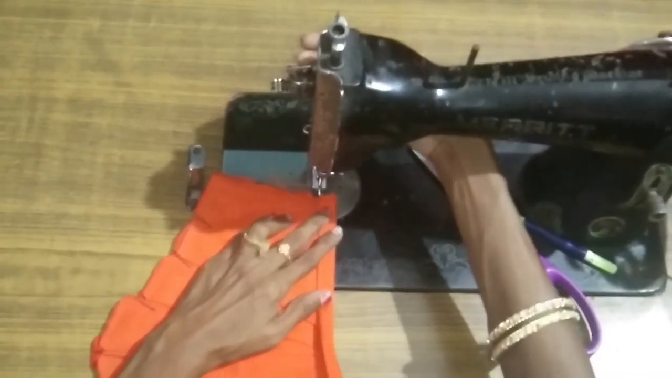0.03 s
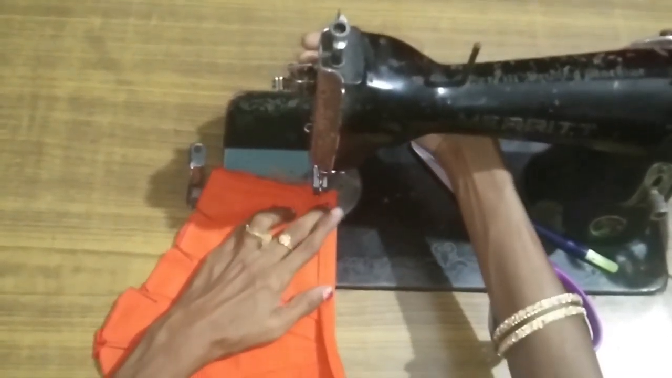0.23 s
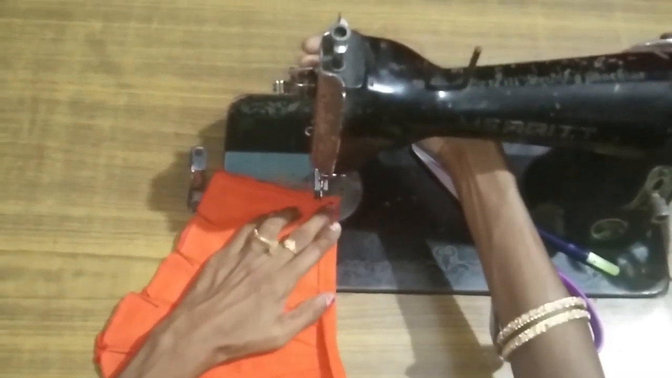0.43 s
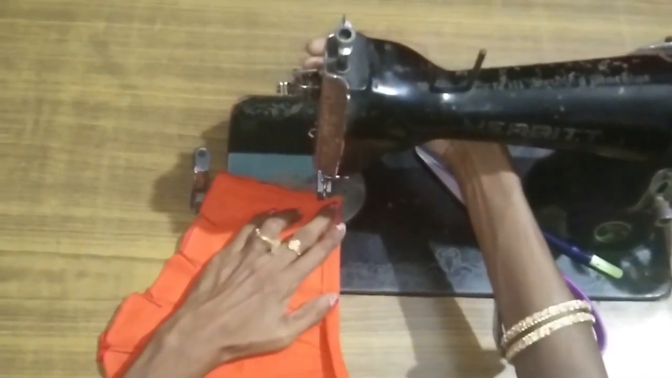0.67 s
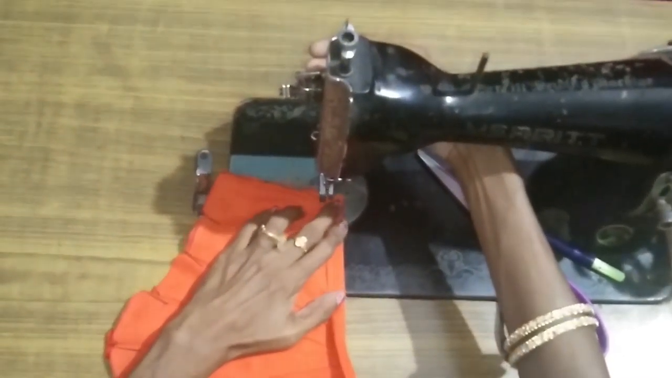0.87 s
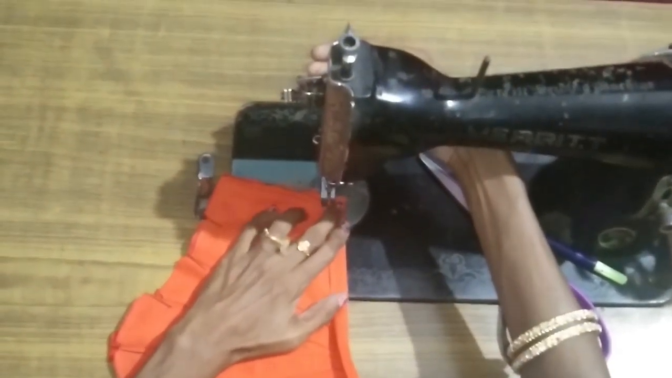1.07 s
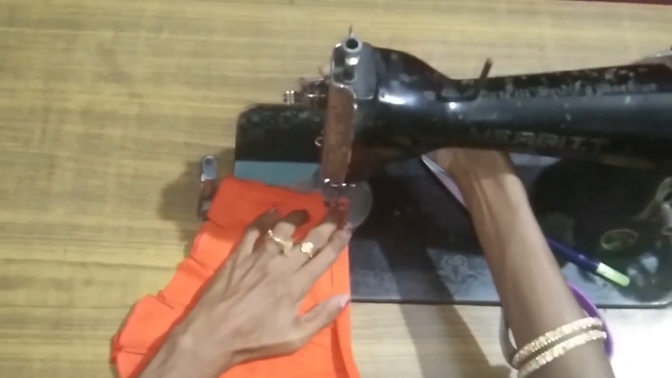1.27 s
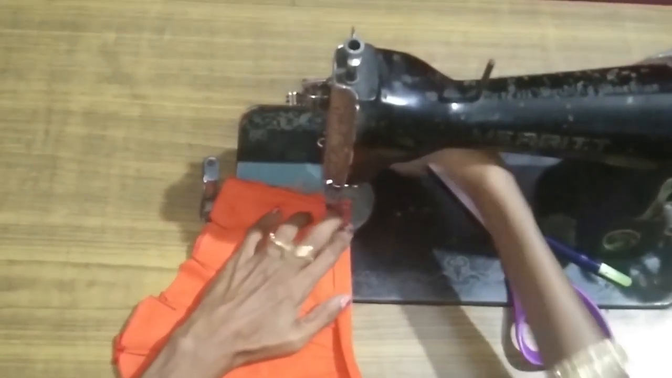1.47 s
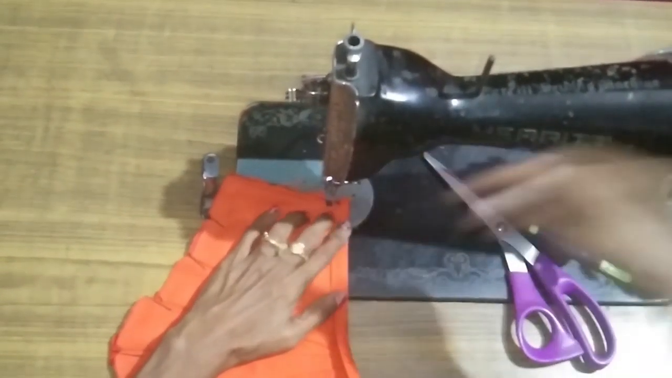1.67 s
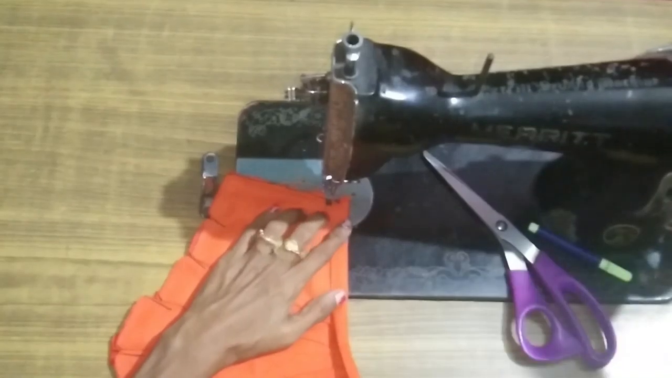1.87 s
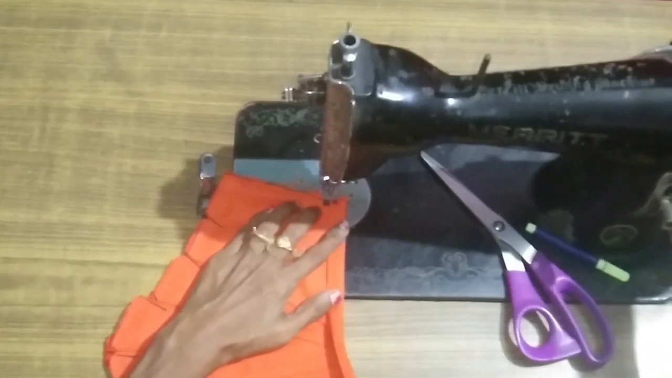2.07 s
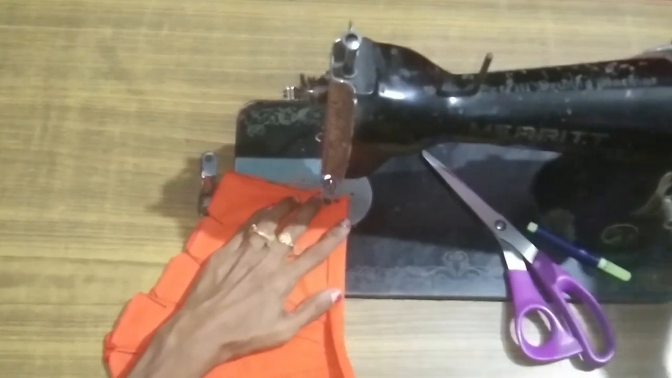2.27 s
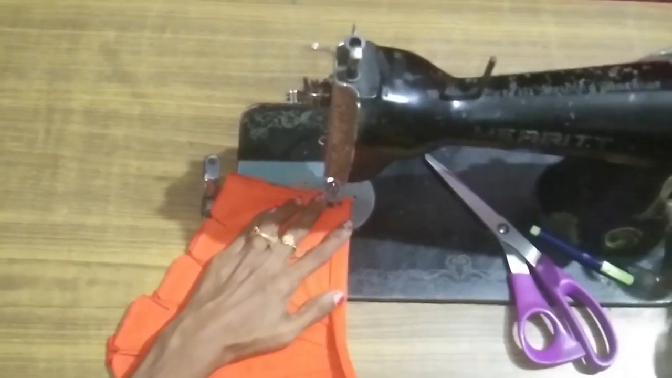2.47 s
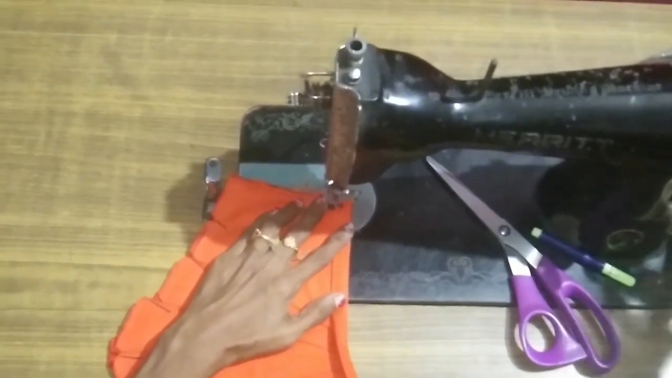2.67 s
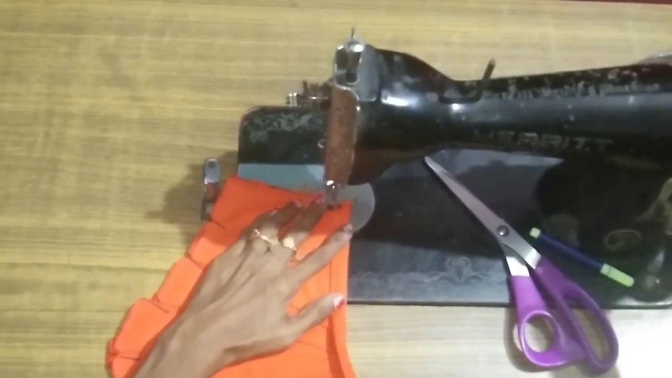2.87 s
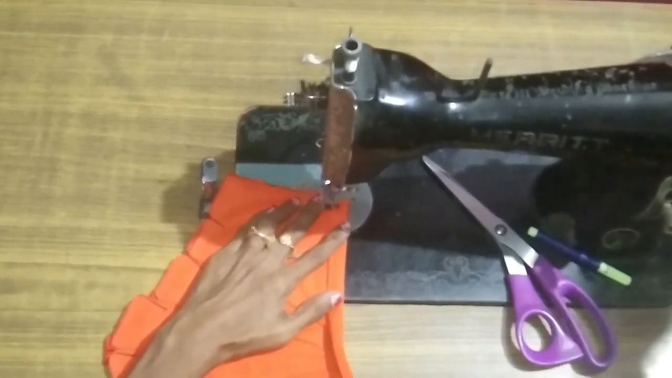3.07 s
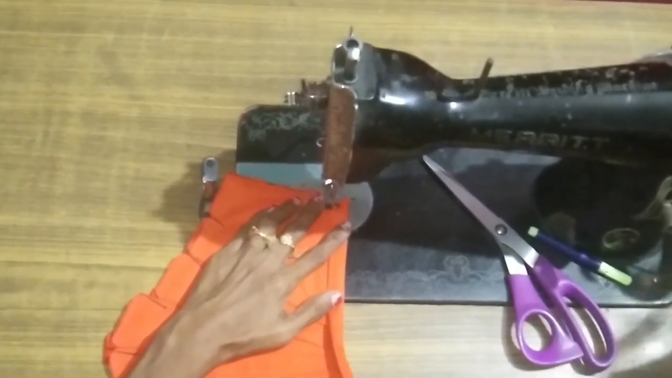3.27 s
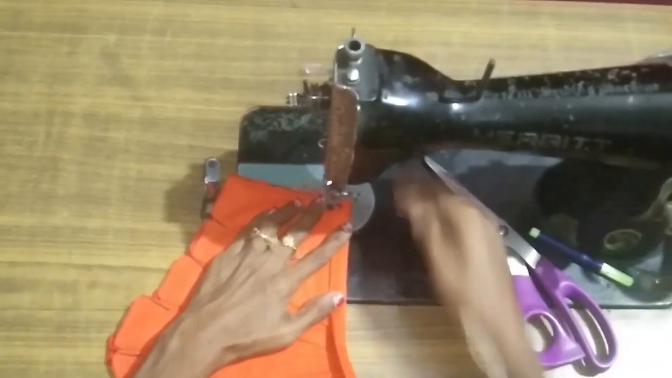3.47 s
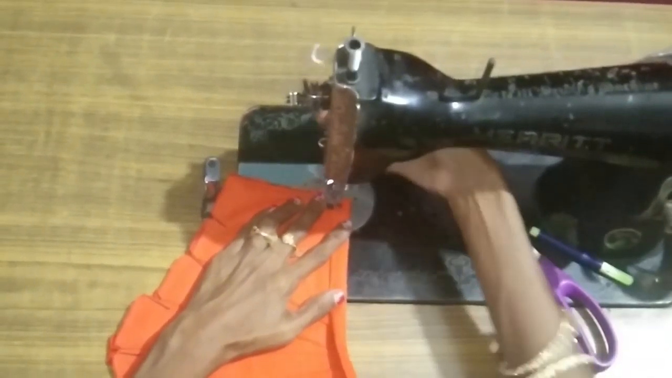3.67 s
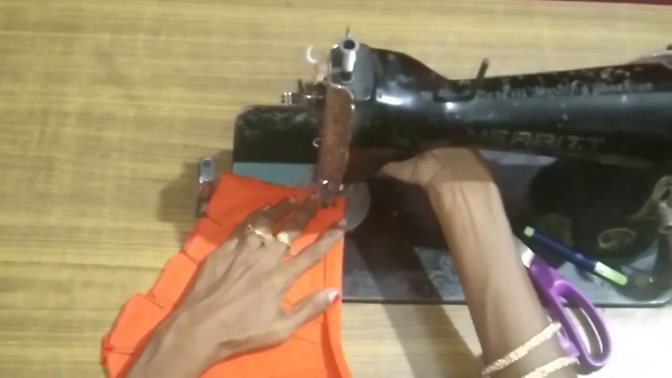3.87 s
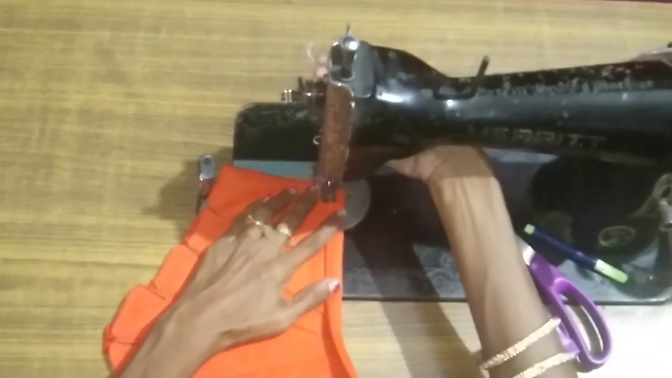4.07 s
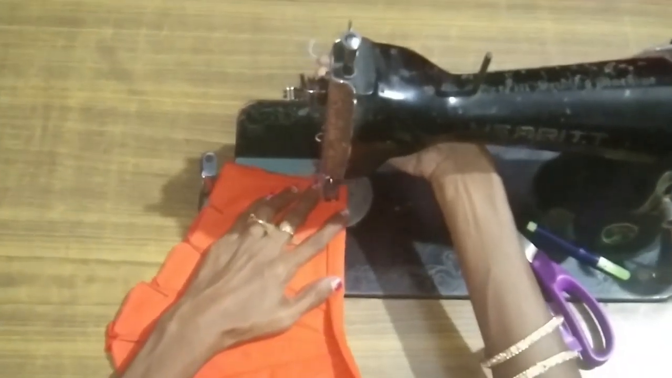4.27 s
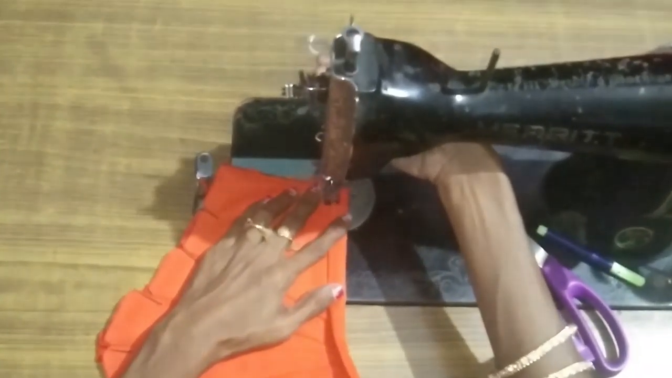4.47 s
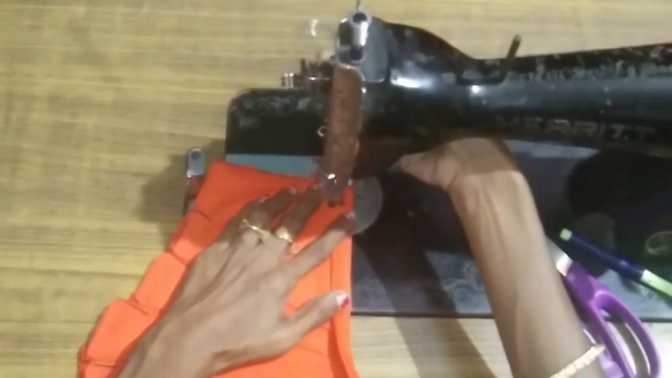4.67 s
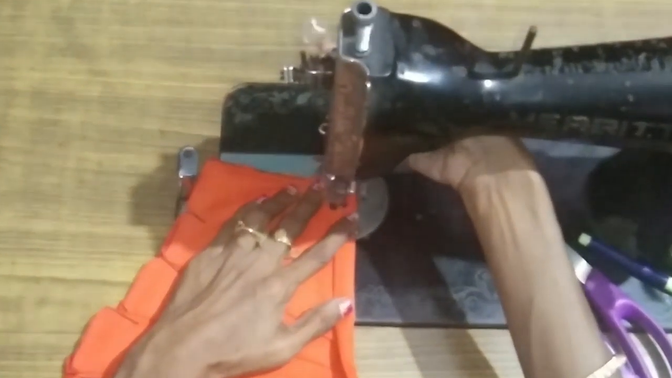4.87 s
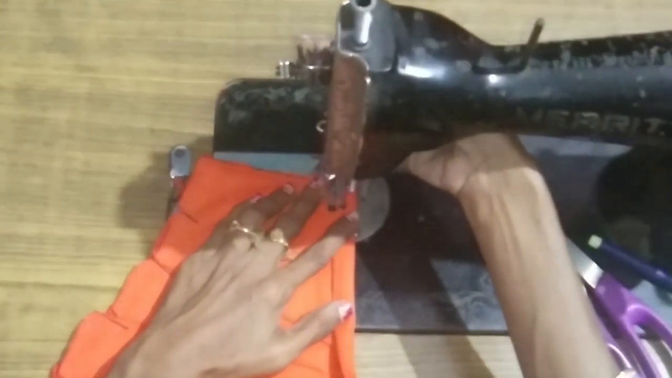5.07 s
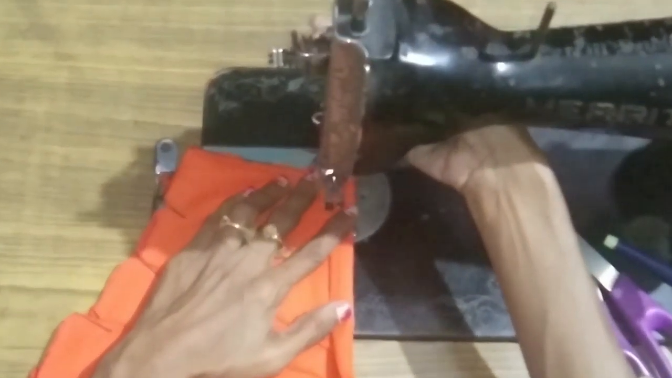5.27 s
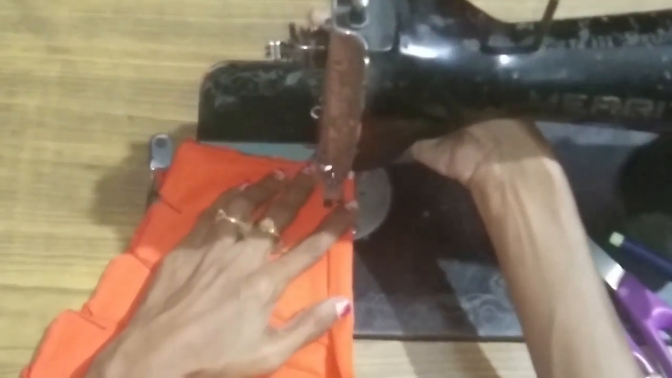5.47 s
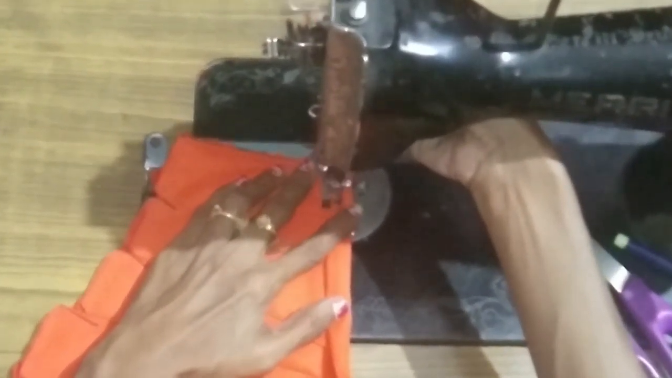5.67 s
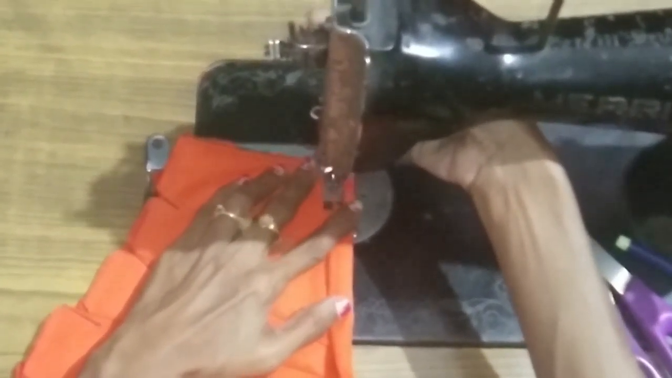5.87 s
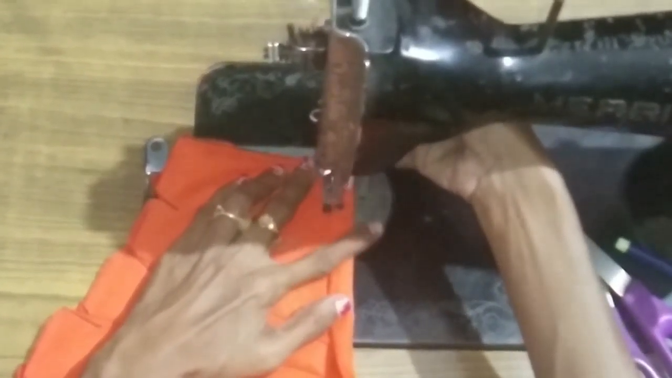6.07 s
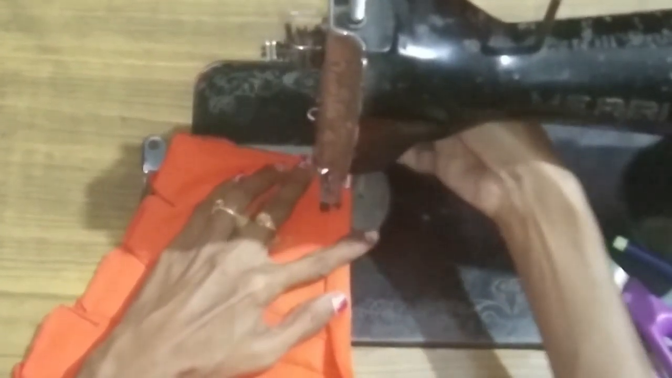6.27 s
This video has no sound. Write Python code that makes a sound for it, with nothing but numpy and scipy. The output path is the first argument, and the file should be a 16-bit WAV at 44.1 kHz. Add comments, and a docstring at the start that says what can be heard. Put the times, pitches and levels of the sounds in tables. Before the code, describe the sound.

After faint cloth rustle and jingling bangles, a sewing machine gives some metal clacks and starts stitching fast with dull thumps.

```python
"""An old cast-iron sewing machine on a wooden table in a small hard room.
After a brief low hum, cloth rustles, the presser foot drops at 1.57 s and bangles jingle.
The handwheel is nudged round with a few clacks; from 3.6 s the machine runs up to seven stitches
a second. Each stitch is a dull thump of the feed, a sharp clack of the needle bar and a softer
rattling return of the shuttle. The blows ring the metalwork and shove the table top."""
import sys
import numpy as np
from scipy import signal
from scipy.fft import rfft, irfft, next_fast_len
from scipy.io import wavfile
from scipy.ndimage import uniform_filter1d

SR = 44100
rng = np.random.default_rng(int(sys.argv[2]) if len(sys.argv) > 2 else 0)


def wav_out(sig):
    """Save sig, one row per channel (or a flat mono array), as 16-bit PCM at SR to the path in sys.argv[1]."""
    wavfile.write(sys.argv[1], SR, np.round(np.clip(np.atleast_2d(sig).T, -1, 1) * 32767).astype(np.int16))


N = 279594
TIME = np.arange(N) / SR

# One shaft turn per stitch. Each row: needle-bar clack in seconds, steel accent in dB,
# thump accent in dB.
STITCHES = [(3.616, -6, -3), (3.84, -.5, 0), (4.036, 0, 1), (4.2397, -.5, -2), (4.4331, 0, 0.5),
            (4.6193, 0, 1), (4.8048, -0.5, 0.5), (4.97, 0.5, 0), (5.1264, -0.5, 2), (5.2886, -1, 1),
            (5.447, 0, -1), (5.603, -0.5, 2.5), (5.76, 0.5, 0), (5.904, -0.5, 0.5), (6.0456, 0, 0.5),
            (6.1886, -.5, 0.5), (6.3334, -0.5, -2.5)]
STITCH_S, STEEL_ACCENT_DB, THUMP_ACCENT_DB = np.transpose(STITCHES)
USUAL_STITCHES_PER_S = 6


def each_stitch(turn, accent_db):
    """The shaft repeats one turn's blows at speed-dependent levels: rows of (s, dB, other columns)."""
    number = np.arange(len(STITCH_S))
    clock_s = np.r_[2 * STITCH_S[0] - STITCH_S[1], STITCH_S, 2 * STITCH_S[-1] - STITCH_S[-2]]
    rows = []
    for turns, level_db, db_per_doubling, *tone in turn:
        start_s = np.interp(number + turns, np.arange(-1, len(STITCH_S) + 1), clock_s)
        levels_db = level_db + accent_db + db_per_doubling * speed_doublings(start_s)
        rows += [(s, db, *tone) for s, db in zip(start_s, levels_db) if s < TIME[-1]]
    return rows


def speed_doublings(times_s):
    """Shaft speed from the stitch spacing, in doublings above the usual speed."""
    stitches_per_s = np.interp(times_s, STITCH_S, 1 / np.gradient(STITCH_S))
    return np.log2(stitches_per_s / USUAL_STITCHES_PER_S)


# Each row: offset in turns, level at usual speed in dB, dB per speed doubling, then table thud,
# iron bed, bright steel and chatter in dB re that level.
TURN_CLACKS = [(-.088, -25, -10, -18, -13, -6.5, -6.5), (0, -10.5, 2, -23.5, -25.5, -8.5, -6.5)]
# Each row: start in seconds, level in dB, then iron bed and bright steel in dB re that level.
HAND_CLACKS = [(1.406, -33, -19, -17.5), (1.5699, -31, -5.5, 0), (2.171, -26.5, -13, -13),
               (2.4266, -33.5, -16, -3.5), (2.4735, -26, -17, -6.5), (2.576, -29, -4.5, -2.5),
               (2.6973, -14.5, -14.5, -7), (2.7558, -17, -13, -6.5), (2.7716, -13.5, -18.5, -8.5),
               (2.9474, -22.5, -20.5, -6.5), (3.0018, -19, -16, -8.5), (3.236, -25.5, -24, -11.5),
               (3.29, -21, -18, -9), (3.5804, -21.5, -19, -9)]


def clacks():
    """Hard blows: presser foot and nudged wheel, then a feed tick and the needle bar in every turn."""
    return by_hand(HAND_CLACKS, chatter_db=-6) + each_stitch(TURN_CLACKS, STEEL_ACCENT_DB)


# Columns as in TURN_CLACKS and HAND_CLACKS.
TURN_RETURNS = [(0.424, -16, 1.2, -26, -15.5, -7.5, -5.5), (0.529, -17, 15, -23, -19.5, -14, -6.5)]
HAND_RETURNS = [(2.1856, -38, -2, -26), (2.4853, -22.5, -12, -9), (3.0923, -28.5, -9, -13),
                (3.1268, -33, -12, -6), (3.4251, -33, -16.5, -7.5)]


def shuttle_returns():
    """Soft, rattling blows as the shuttle and take-up lever come back."""
    return by_hand(HAND_RETURNS, chatter_db=-2) + each_stitch(TURN_RETURNS, STEEL_ACCENT_DB)


def by_hand(rows, chatter_db):
    """Hand-driven strokes: rows of start in seconds, then level, thud, bed, steel and chatter in dB."""
    return [(s, db, bed_db - 2.5, bed_db, steel_db, chatter_db) for s, db, bed_db, steel_db in rows]


# Each row: offset in turns, level at usual speed in dB, dB per speed doubling, then deep boom
# and linkage rattle in dB re that level.
TURN_THUMPS = [(-.16, -30, 3, -7.5, 2.5), (-.06, -36.5, 14, -14, -2), (.12, -41, 15, -1, 11.5),
               (.49, -36.5, 4, -8, 4)]
# Each row: start in seconds, level in dB.
HAND_THUMPS = [(2.185, -32.5), (2.683, -26), (3.222, -33.5), (3.568, -36.5)]


def feed_thumps():
    """Dull blows of crank and feed, by hand and then in every turn."""
    boom_db, rattle_db = -20, -4.5
    nudged = [(s, db, boom_db, rattle_db) for s, db in HAND_THUMPS]
    return nudged + each_stitch(TURN_THUMPS, THUMP_ACCENT_DB)


def contacts(start_s, level_db, chatter_db, crack_db, crack_s, chatter_s, swell_s):
    """A first contact builds in about 2 ms; loose parts cross their play, then chatter and settle."""
    crack = decays(start_s, level_db + crack_db, crack_s)
    crack = uniform_filter1d(uniform_filter1d(crack, size=54), size=36)
    chatter_start_s = start_s + 0.0074
    settling = decays(chatter_start_s, level_db + chatter_db, chatter_s)
    swelling = decays(chatter_start_s, level_db + chatter_db, swell_s)
    return grains(np.abs(crack), per_s=SR) + grains(np.abs(settling - swelling), per_s=1600)


def strokes(rows, crack_db, crack_s, chatter_s, swell_s):
    """Shaking of iron bed, arm and small steel parts; the heavier the part, the longer the contact."""
    start_s, level_db, _, bed_db, steel_db, chatter_db = np.transpose(rows)
    arm_crack_db = -3.5  # the heavy arm hardly follows a first contact
    parts = [(bed_db, 1.4, 0), (0, 1.2, arm_crack_db), (steel_db, 1, 0)]
    return np.array([contacts(start_s, level_db + part_db, chatter_db, crack_db + soften_db,
                              crack_s * stretch, chatter_s * stretch, swell_s * stretch)
                     for part_db, stretch, soften_db in parts])


# Each row: frequency in Hz, relative level in dB.
METAL_SPECTRUM = [(350, -25.5), (600, -5), (1000, -7), (1700, -6.5), (2300, -2.5), (3300, -1), (3900, -3.5),
                  (5800, 2.5), (7200, 4), (8300, -8), (10000, -19), (12500, -30.5), (15500, -28.5)]
# Each row: centre in Hz, width in Hz, lift in dB.
METAL_MODES = [(648, 28, 8), (1850, 80, 4), (2000, 70, -5), (2130, 24, 7), (2263, 40, 5.5), (2470, 50, -3),
               (2631, 28, 5), (2773, 25, 5), (3160, 20, 6.5), (3318, 28, 4.5), (3476, 24, 7.5),
               (3523, 22, 3), (3857, 22, 3), (4277, 26, 5), (4480, 100, 3), (6946, 25, 2), (7223, 25, 4),
               (7297, 26, 5)]


def metalwork(clack_rows, return_rows, thump_rows):
    """Clacks, returns, slack linkage and sliding steel ring the body of the machine."""
    hard = strokes(clack_rows, crack_db=1.5, crack_s=0.0034, chatter_s=0.017, swell_s=0.0036)
    soft = strokes(return_rows, crack_db=0, crack_s=0.0066, chatter_s=0.021, swell_s=0.0052)
    bed, arm, steel = hard + soft
    blows = (from_db(15) * cut(bed, 1850, "low", order=3)
             + from_db(1.2) * cut(arm, [1800, 4000], "band")
             + from_db(4) * cut(steel, 3700, "high", order=3))
    # the linkage takes up its slack after each thump
    thump_s, thump_db, _, rattle_db = np.transpose(thump_rows)
    slack = decays(thump_s + 0.0092, thump_db + rattle_db - 3.5, decay_s=0.015)
    hiss = rubbing(hand_db=-55, usual_db=-53, db_per_doubling=10)
    shaking = room(blows + grains(slack + hiss, per_s=1600), wet_db=1.5, build_s=0.002)
    return colour(shaking + tension_spring(shaking), METAL_SPECTRUM, METAL_MODES)


# Each row: centre in Hz, width in Hz, relative level in dB.
SPRING_MODES = [(6500, 160, -1), (6850, 100, 6.5), (7350, 98, -30)]


def tension_spring(shaking):
    """The thread-tension spring pings near 7 kHz when the steel parts shake it."""
    ring = np.zeros(N)
    for hz, width_hz, db in SPRING_MODES:
        band = cut(shaking, [hz - width_hz / 2, hz + width_hz / 2], "band", order=1)
        ring += from_db(db) * np.sqrt(SR / (np.pi * width_hz)) * band
    return from_db(-28) * ring


# Table top and its deep boom. Each row: frequency in Hz, relative level in dB.
WOOD_SPECTRUM = [(120, -31.5), (220, -8), (300, -7), (420, 2.5), (520, -9), (800, -16.5), (1500, -21),
                 (4000, -64)]
BOOM_SPECTRUM = [(30, -39), (60, -14), (80, 2), (105, -7), (150, 11), (200, -5.5), (350, -5.5), (1500, -67)]
# Each row: centre in Hz, width in Hz, lift in dB.
TABLE_MODES = [(84.5, 33, 9), (146.16, 23, -1), (180, 9.9, 4), (217, 34, 5), (354.6, 32, 9), (434, 150, 2),
               (460, 38, 4), (690, 10, -3)]


def table_top(stroke_rows, thump_rows):
    """Every thump and stroke shoves the wooden top; the machine judders on it and the belt rumbles."""
    thump_s, thump_db, boom_db, _ = np.transpose(thump_rows)
    stroke_s, stroke_db, thud_db = np.transpose(stroke_rows)[:3]
    thump_power = decays(thump_s, thump_db - 1.5, decay_s=0.034)
    stroke_power = decays(stroke_s, stroke_db + thud_db - 2.5, decay_s=0.023)
    belt_power = rubbing(hand_db=-54, usual_db=-54, db_per_doubling=18)
    judder = grains(thump_power + stroke_power + belt_power, per_s=SR)
    thuds = pushes(stroke_s + 0.0018, stroke_db + thud_db + 25)
    knock = pushes(thump_s, thump_db + 17.5) + thuds + judder
    heave = pushes(thump_s, thump_db + boom_db + 24) + from_db(-13.5) * thuds + from_db(-11.5) * judder
    wood = colour(room(knock, wet_db=-6, build_s=0.0027, spots=3), WOOD_SPECTRUM, TABLE_MODES)
    boom = from_db(-1) * colour(heave, BOOM_SPECTRUM, TABLE_MODES)
    return cut(wood + boom, 55, "high")  # the table is too small to radiate lower


def rubbing(hand_db, usual_db, db_per_doubling):
    """Power of a rubbing part: steady while the wheel is nudged, growing with speed once it runs."""
    nudged = (TIME > 2.48) & (TIME < 3.55)
    running = TIME > STITCH_S[0]
    running_db = usual_db + db_per_doubling * speed_doublings(TIME)
    return (nudged * from_db(hand_db) + running * from_db(running_db)) ** 2


# Each row: time in seconds, gain in dB.
LEVEL_DIP = [(3.170, -5), (3.176, -17), (3.226, -13), (3.233, -4)]


def sewing_machine():
    """The same blows drive metalwork and table; the level dips briefly near 3.2 s."""
    clack_rows, return_rows, thump_rows = clacks(), shuttle_returns(), feed_thumps()
    metal = metalwork(clack_rows, return_rows, thump_rows)
    wood = table_top(clack_rows + return_rows, thump_rows)
    return (metal + wood) * from_db(np.interp(TIME, *np.transpose(LEVEL_DIP)))


# Each row: relative level in dB, centre in Hz, width in Hz, decay in seconds.
FOOT_MODES = [(-31, 334, 110, 0.0091), (-39.5, 940, 190, 0.0077), (-28, 5200, 2700, 0.0036)]


def presser_foot(drop_s):
    """The presser foot lands and rings."""
    return sum(burst(drop_s, *mode) for mode in FOOT_MODES)


# Each row: start in seconds, relative level in dB, centre in Hz, width in Hz, decay in seconds.
PINGS = [(1.179, -47.5, 7940, 3290, 0.0052), (1.407, -46, 1450, 400, 0.011),
         (1.561, -41, 6000, 3000, 0.0085), (1.999, -38, 4160, 1100, .0025), (2, -40, 6960, 1500, 0.0018),
         (2.267, -44.5, 6930, 150, 0.027), (2.685, -35, 418, 110, 0.013), (2.691, -48, 83, 30, 0.065),
         (2.768, -26, 4370, 300, 0.0064), (2.774, -35, 3040, 350, 0.017), (2.96, -40, 14600, 450, .025),
         (2.96, -43, 12400, 350, .04), (3.004, -38.5, 478, 54, 0.016), (3.18, -52.5, 2740, 600, 0.054),
         (5.64, -35, 800, 70.1, 0.016)]


def pings():
    """Single ticks, knocks and rings, including a high bangle jingle near 3 s."""
    return sum(burst(*row) for row in PINGS)


# Each row: start in seconds, relative level in dB, decay in seconds.
BANGLES = [(1.75, -44, 0.072), (1.815, -38, 0.021), (1.93, -50, 0.055), (3.28, -53, .03), (3.49, -43, 0.06)]


def bangles():
    """Bangles jingle as the arm is drawn back."""
    return sum(burst(s, db, hz=12800, width_hz=6300, decay_s=decay_s) for s, db, decay_s in BANGLES)


# Columns as in PINGS.
RUSTLES = [(0.432, -60, 1680, 900, 0.095), (0.599, -57, 5070, 850, 0.16), (0.619, -61, 7040, 2000, 0.13),
           (1.179, -57.5, 2960, 800, .08)]


def cloth():
    """Cloth slides under the fingers."""
    return sum(burst(*row) for row in RUSTLES)


# Each row: frequency in Hz, relative level in dB.
MIC_SPECTRUM = [(6000, 2.5), (7200, 3), (8300, -8.5), (10000, -21), (12500, -23), (15500, -21)]


def handling():
    """The small sounds in the room, dulled above about 7.5 kHz by the microphone."""
    touches = cloth() + bangles() + presser_foot(drop_s=1.57) + pings()
    dulled = colour(from_db(-1.5) * touches, MIC_SPECTRUM)
    return room(dulled, wet_db=-4.5, build_s=0.0023, spots=1)


# Table and wall reflections. Each row: nominal delay in seconds, relative gain.
ECHOES = [(.0035, 0.59), (0.0124, 0.33), (0.0188, 0.38), (.0238, 0.32)]


def room(x, wet_db, build_s, spots=4, t60_s=0.45):
    """Direct sound, near reflections and a diffuse tail; each contact spot has its own paths."""
    t = TIME[:SR // 3]
    tail = from_db(-60 * t / t60_s) * (1 - np.exp(-t / build_s))
    tail /= np.sqrt(np.sum(tail ** 2))
    delays_s, gains = np.transpose(ECHOES)
    spot = np.arange(N) // 100 % spots  # next spot every 100 samples
    out = x.copy()
    for k in range(spots):
        path = tail * rng.choice([-1, 1], len(t))
        arrivals_s = delays_s * rng.uniform(0.85, 1.15, len(delays_s))
        path[(arrivals_s * SR).astype(int)] += gains
        out += from_db(wet_db) * signal.oaconvolve(x * (spot == k), path)[:N]
    return out


def hum(hz=150, start_s=0.053, end_s=0.346, fade_s=0.035, rms_db=-55.5):
    """A faint, brief, slightly wavering low tone."""
    waver = cut(rng.standard_normal(N), 8, "low")
    phase = 2 * np.pi * np.cumsum(hz + 3 * waver / waver.std()) / SR
    envelope = np.clip(np.minimum(TIME - start_s, end_s - TIME) / fade_s, 0, 1)
    return from_db(rms_db) * envelope * np.sqrt(2) * np.sin(phase)


# Each row: frequency in Hz, relative noise density in dB.
AIR_SPECTRUM = [(25, -22), (55, -13), (90, -6.5), (150, -4.5), (200, -9.5), (300, -2.5), (500, -10),
                (1000, -13), (2500, -15), (5000, -20), (7300, -19), (8600, -33.5), (11000, -43.5),
                (15500, -48)]


def room_air(rms_db=-53):
    """Steady background noise of the room."""
    return from_db(rms_db) * colour(rng.standard_normal(N), AIR_SPECTRUM)


def burst(start_s, level_db, hz, width_hz, decay_s):
    """Dying grains excite one resonance."""
    power = from_db(level_db) ** 2 * np.exp(-2 * TIME[:SR] / decay_s)
    band = cut(grains(power, per_s=17000), [hz - width_hz / 2, hz + width_hz / 2], "band")
    return np.pad(band * np.sqrt(SR / (2 * width_hz)), (int(start_s * SR), N))[:N]


def pushes(times_s, levels_db):
    """One brief shove per blow."""
    out = np.zeros(N)
    np.add.at(out, np.clip(np.round(times_s * SR).astype(int), 0, N - 1), from_db(levels_db))
    return out


def decays(times_s, levels_db, decay_s):
    """Power envelope of blows that start at once and die away."""
    pole = np.exp(-2 / (decay_s * SR))
    return signal.lfilter([1], [1, -pole], pushes(times_s, levels_db) ** 2 + 1e-24)


def grains(power, per_s):
    """Tiny contacts at random moments, whose mean power follows an envelope."""
    chance = per_s / SR
    hits = rng.random(len(power)) < chance
    return np.sqrt(power / chance) * hits * rng.choice([-1, 1], len(power))


def colour(x, spectrum, modes=()):
    """Causal filter of unit power gain: a broad spectrum with resonances on top."""
    size = 2 * next_fast_len(N // 2 + SR // 4)
    hz = np.maximum(np.arange(size // 2 + 1) * SR / size, 1)
    points_hz, points_db = np.transpose(spectrum)
    level_db = np.interp(np.log(hz), np.log(points_hz), points_db)
    for centre_hz, width_hz, lift_db in modes:
        level_db += lift_db / (1 + (2 * (hz - centre_hz) / width_hz) ** 2)
    gain = from_db(level_db)
    cepstrum = irfft(np.log(gain / np.sqrt(np.mean(gain ** 2))))
    cepstrum[1:size // 2] *= 2  # fold to minimum phase
    cepstrum[size // 2 + 1:] = 0
    return irfft(rfft(x, size) * np.exp(rfft(cepstrum)))[:N]


def cut(x, hz, kind, order=2):
    """Butterworth filter."""
    return signal.sosfilt(signal.butter(order, hz, kind, fs=SR, output="sos"), x + 1e-18)


def from_db(db):
    """Decibels to gain."""
    return 10 ** (np.asarray(db) / 20)


def scene():
    """Machine, table and hands over a steady background, in mono."""
    return (sewing_machine() + handling() + room_air() + hum())[None]


def record(dry):
    """Steep low-pass at 15.9 kHz."""
    return signal.sosfilt(signal.ellip(10, 0.2, 70, 15900, fs=SR, output="sos"), dry)


dry = scene()
out = record(dry)
wav_out(out)
```